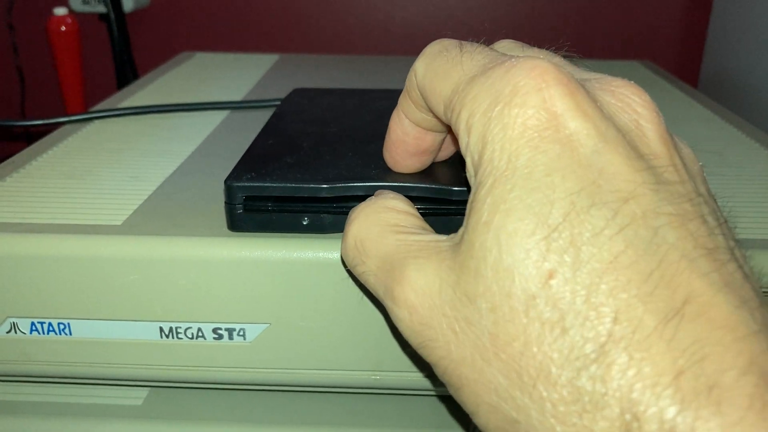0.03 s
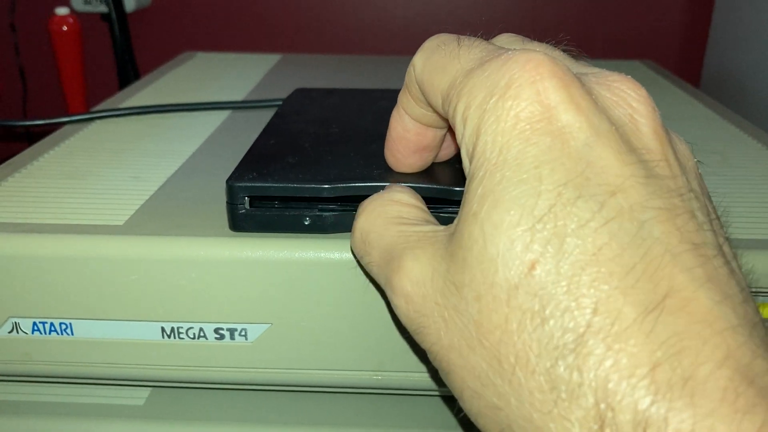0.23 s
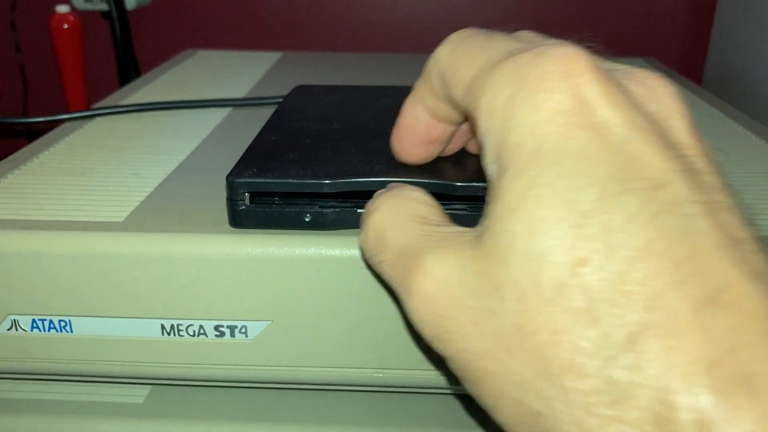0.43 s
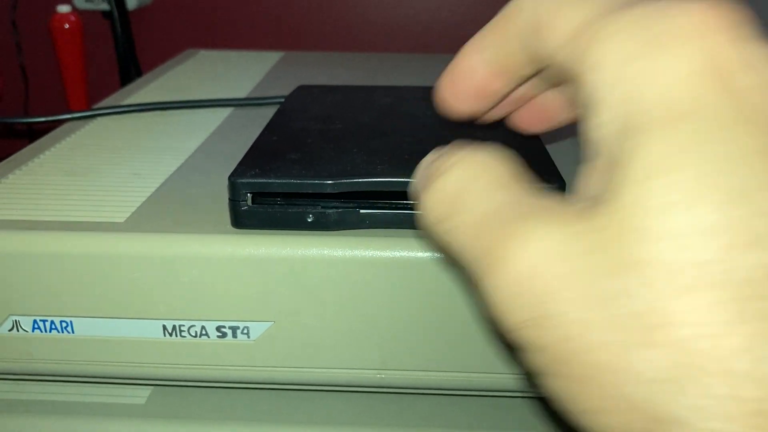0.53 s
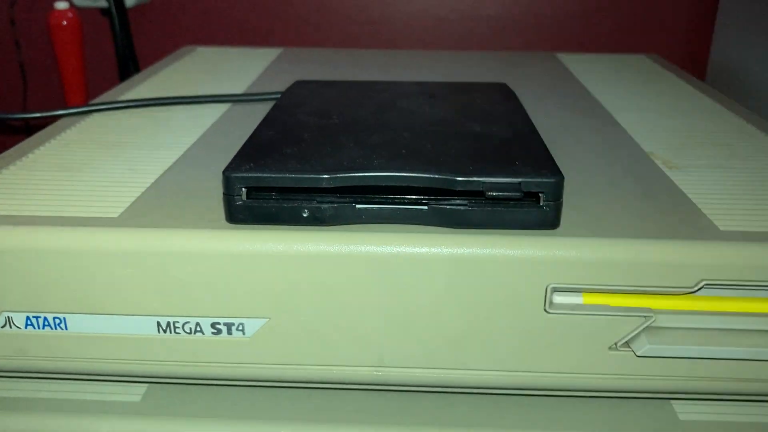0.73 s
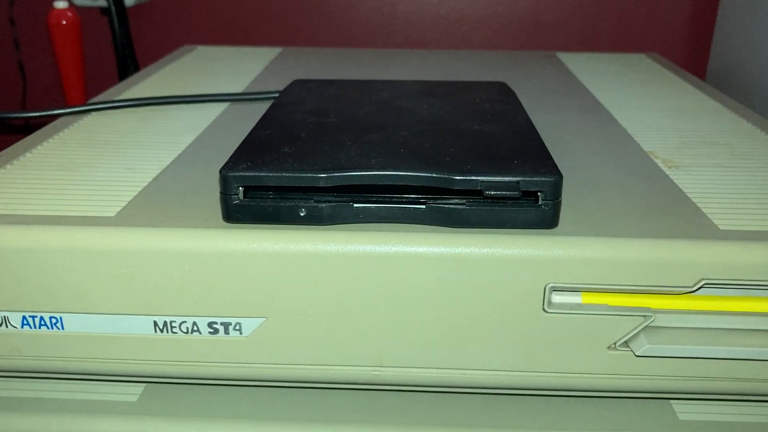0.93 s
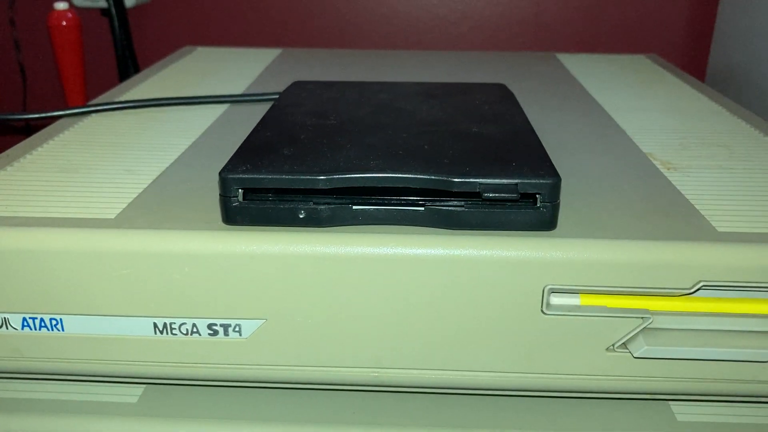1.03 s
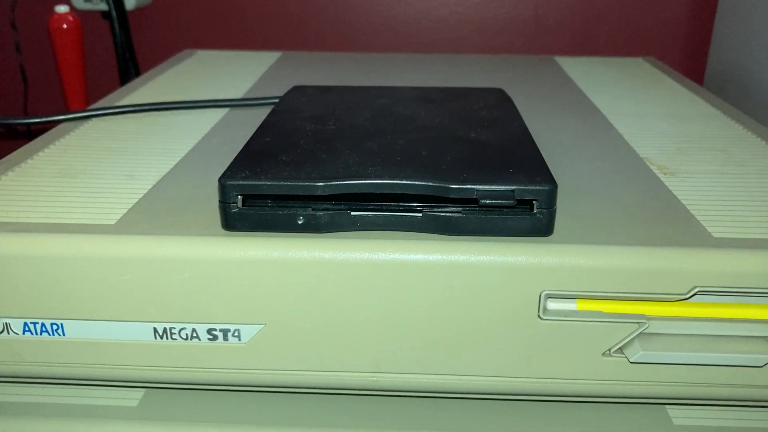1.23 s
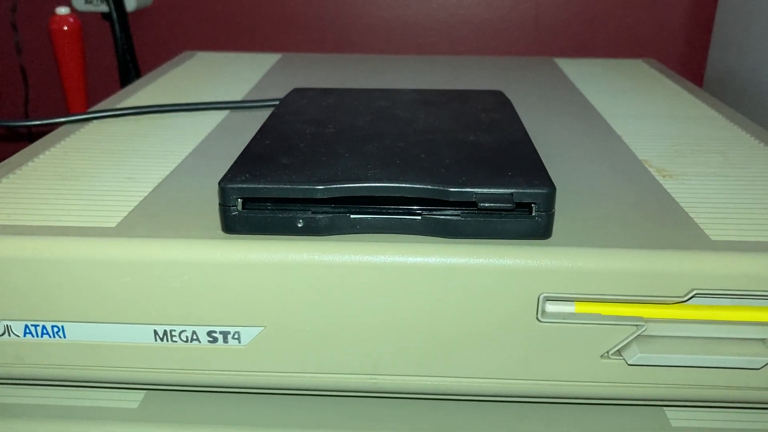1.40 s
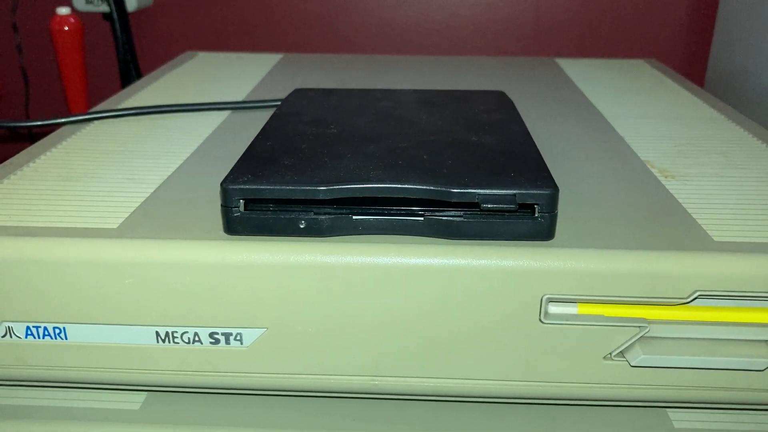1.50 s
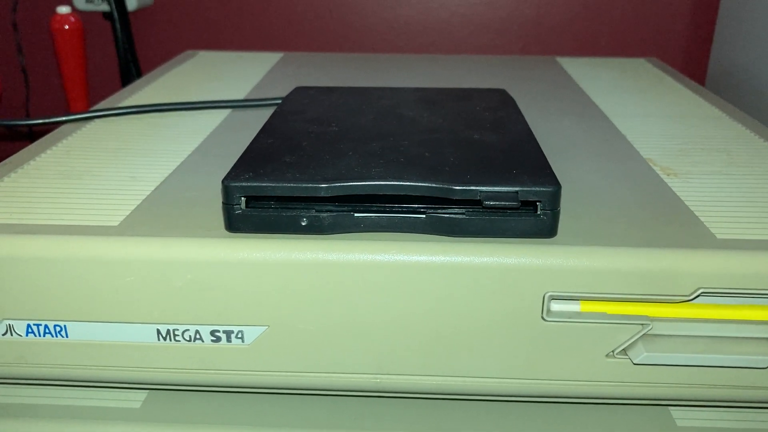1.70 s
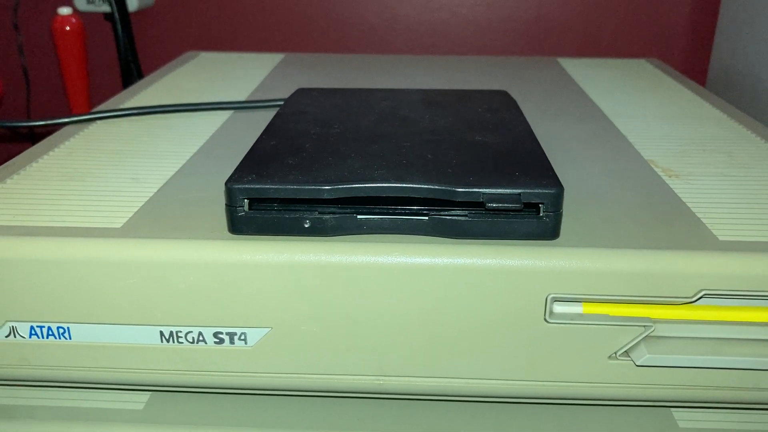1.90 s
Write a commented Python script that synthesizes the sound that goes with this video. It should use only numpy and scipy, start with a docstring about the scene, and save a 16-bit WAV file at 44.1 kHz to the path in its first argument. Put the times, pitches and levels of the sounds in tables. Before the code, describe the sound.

A floppy disk is pushed into a small plastic drive, heard close in stereo: faint rubbing and a tiny tick near 0.1 s, then a loud, bright, rattling clack at 0.2 s with a hollow case thud and short room tail. A light click and raspy motor chirp follow at 0.32 s, strain until 0.6 s, soft spinning until 1.1 s. Steady airy fan whine runs throughout, slightly brighter later.

```python
"""A fan whines throughout, brighter once the hand has moved away, while a floppy disk slides into its drive.
The disk nudges the latch, the carriage snaps down with a clatter and shakes the case, a last catch clicks,
and the drive motor chirps and spins briefly. Contacts excite dense noise rings and decaying sine modes.
Fan and motor layer wavering tones over shaped noise; the disk's rub and the latch scrape are gated noise.
The small plastic drive stands on a computer case, close to a pair of microphone ports."""
import sys
import numpy as np
from scipy import signal
from scipy.fft import rfft, irfft, next_fast_len
from scipy.io import wavfile

SR = 44100
rng = np.random.default_rng(int(sys.argv[2]) if len(sys.argv) > 2 else 0)


def dump_mix(stems):
    """Bounce the given channels to the path in sys.argv[1] as a 16-bit WAV at rate SR."""
    frames = np.atleast_2d(stems).T  # one column per channel
    limited = np.clip(frames, -1, 1)  # hard clip at full scale
    pcm = np.round(limited * 32767).astype(np.int16)
    wavfile.write(sys.argv[1], SR, pcm)


N = 85995  # length [samples]

# Rushing air of the fan: (frequency [Hz], density [dB per Hz])
AIR_SPECTRUM = [(20, -53.5), (35, -41), (55, -13.5), (80, -12.5), (130, -10.5), (250, -11.5), (400, -13),
                (520, -18.5), (680, -7.5), (800, -13), (980, -20), (1200, -12.5), (1360, -19),
                (1550, -13.5), (1850, -12.5), (2050, -19), (2500, -16.5), (2900, -16.5), (3800, -25.5),
                (4150, -18), (4950, -31), (5400, -31), (6500, -30), (6900, -23), (7600, -32.5), (8600, -26),
                (9300, -44), (16000, -59)]
# Disk rubbing in its sleeve or along its guides: (frequency [Hz], density [dB per Hz])
RUB_SPECTRUM = [(30, -34), (70, -16), (160, 2.5), (240, 5), (420, -8.5), (650, 4), (950, -7), (1500, -7),
                (4000, -13.5), (16000, -41)]
# Contacts of disk, latch and carriage: (time [s], level [dB], brightness [dB per octave])
DRIVE_CONTACTS = [(0.0909, -29.5, -4.5), (0.099, -32, -5.5), (.199, -21, -0.5), (0.2, -11.5, 7.5),
                  (.2028, -4, -3), (.2061, 0, 0.5), (0.2086, -5.5, 1), (.212, -6, 0), (.2142, -6, -1.5),
                  (.219, -13.5, -7.5), (0.224, -13, 0), (.3128, -29.5, 1), (0.316, -20, 1)]
CLACK_RISE_S = 0.00027  # attack time constant of the drive's plastic and modes


def amp(db):
    """Turns decibels into gain."""
    return 10 ** (np.asarray(db) / 20)


def unit(x):
    """Scales a sound to rms 1."""
    return x / np.sqrt(np.mean(x ** 2) + 1e-20)


def read(points, hz):
    """Reads a frequency table on a logarithmic axis."""
    f, value = np.transpose(points)
    return np.interp(np.log(hz + 1), np.log(f + 1), value)


def add(mix, s, sound):
    """Mixes a sound in at time s [s], cut off at the end of the mix."""
    part = mix[..., max(round(s * SR), 0):][..., :sound.shape[-1]]
    part += sound[..., :part.shape[-1]]


def colour(x, gain):
    """Filters a sound by a gain that is a function of frequency."""
    n = x.shape[-1]
    size = next_fast_len(2 * n)
    spectrum = rfft(x, size) * gain(np.fft.rfftfreq(size, 1 / SR))
    return irfft(spectrum, size)[..., :n]


def pair(size):
    """White diffuse noise at two nearby ports, partly alike in each band."""
    # Likeness of diffuse sound at the two ports: (frequency [Hz], correlation [0 to 1])
    likeness = [(50, 0.71), (150, 0.7), (300, .8), (1000, 0.42), (2500, .5), (5000, .55), (8000, 1),
                (15000, 1)]
    same = lambda f: np.clip(read(likeness, f), 0, 1)
    left, other = rng.standard_normal((2, size))
    right = colour(left, same) + colour(other, lambda f: np.sqrt(1 - same(f) ** 2))
    return np.array([left, right])


def noise(spectrum):
    """Steady diffuse noise of a given spectrum, rms 1."""
    return unit(colour(pair(N), lambda f: amp(read(spectrum, f))))


def ring(spectrum, t60, rise, size):
    """A dense ring: noise whose bands each die at their own speed."""
    hz, t, bands = signal.stft(pair(size), SR, nperseg=256)
    life = np.maximum(read(t60, hz), 1e-3)[:, None]
    # Short-lived bands start louder, so that decay time does not change their energy
    level = np.sqrt(np.log(1e6) / life / SR)
    x = signal.istft(bands * amp(-60 * t / life) * level, SR, nperseg=256)[1][:, :size]
    attack = 1 - np.exp(-np.arange(size) / SR / rise)
    return colour(x * attack, lambda f: amp(read(spectrum, f)))


def tone(hz, db, waver):
    """A sine whose phase and level waver slowly, as a turning part's do."""
    slow = lambda: unit(colour(rng.standard_normal(N), lambda f: np.exp(-(f / 14) ** 2)))
    turns = hz * np.arange(N) / SR + rng.random()
    level = amp(db) * np.sqrt(2) * (1 + waver * slow())
    return level * np.sin(2 * np.pi * turns + waver * slow())


def gate(on, off, rise, fade):
    """Linear attack, hold and exponential release, all times in seconds."""
    t = np.arange(N) / SR
    return np.clip((t - on) / rise, 0, 1) * np.exp(-np.maximum(t - off, 0) / fade)


def whistles(count=170):
    """Thin steady lines from bearings and vents, at a different phase in each port."""
    # Bearing whistles, some clear, some barely audible: (frequency [Hz], level [dB])
    bearing = [(2358, -106.5), (2552, -70), (2638, -95), (2740, -87.5), (2998, -72.5), (3300, -81.5),
               (3381, -83), (3612, -81), (4016, -91.5), (5340, -90.5)]
    t = np.arange(N) / SR
    line = lambda hz: np.sqrt(2) * np.sin(2 * np.pi * (hz * t + rng.random((2, 1)) / 2))
    # Many faint lines follow the air's spectrum with a random spread in level
    hz = rng.uniform(450, 7000, count)
    spread_db = 4.5 * np.minimum(rng.standard_normal(count), 1)
    phase = np.exp(1j * np.pi * rng.random((2, count)))
    bins = np.zeros((2, N // 2 + 1), complex)
    bins[:, (hz * N / SR).astype(int)] = amp(read(AIR_SPECTRUM, hz) + spread_db) * phase
    faint = amp(-58.5) * unit(irfft(bins, N))
    return faint + sum(amp(db) * line(f) for f, db in bearing)


def fan():
    """Blade tones, motor whine and rushing air, their treble shaded by the hand; mains hum and hiss beneath."""
    # Blade tone and its harmonics: (level [dB], right minus left [dB])
    blades = [(-69.5, 1), (-55, 1.5), (-65, 4), (-77.5, 2.5), (-59.5, -2.5)]
    # The hand's shadow on the fan's treble: (time [s], level [dB])
    hand = [(0, -5), (.4, -2), (.7, -3), (1.1, -2), (1.499, -0.5), (1.95, -0.5)]
    # Hiss beneath the fan: (frequency [Hz], density [dB per Hz])
    hiss = [(100, -73), (5000, 0), (8000, -17.5), (11300, 1.5), (12100, -12), (13500, -5.5), (15200, 7.5),
            (15800, -2), (16300, -40.5)]
    blade_hz, flutter_hz, flutter_depth, shadow_hz = 382.3, 21.6, 0.8, 1085
    t = np.arange(N) / SR

    x = amp(-57) * noise(AIR_SPECTRUM) + whistles()
    for k, (db, side_db) in enumerate(blades):
        sides = amp([[-side_db / 2], [side_db / 2]])
        x = x + tone((k + 1) * blade_hz, db, waver=0.09) * sides
    # The lower motor whine pulses as the motor turns
    flutter = 1 + flutter_depth * np.sin(2 * np.pi * flutter_hz * t)
    x = x + tone(1700.6, -62.5, waver=0.21) * flutter
    x = x + tone(2126.3, -66.5, waver=0.34)

    treble = colour(x, lambda f: f ** 4 / (f ** 4 + shadow_hz ** 4))
    shade = amp(np.interp(t, *np.transpose(hand)))
    mains_hum = tone(59.5, -67, waver=0.27)
    return x + (shade - 1) * treble + mains_hum + amp(-70.5) * noise(hiss)


def slide():
    """The disk rubs along its guides as it goes in: gated friction noise."""
    return amp(-55.5) * noise(RUB_SPECTRUM) * gate(on=0, off=0.199, rise=0.02, fade=0.02)


def brightness(hz, tilt_db):
    """Hard contacts favour the treble, soft ones the middle: a tilt about 3 kHz, level below 700 Hz."""
    return amp(tilt_db * np.log2(np.maximum(hz, 700) / 3000))


def mechanism():
    """The carriage scrapes off its latch; each contact cracks through the dense ring of the plastic."""
    # The drive's dense plastic ring: (frequency [Hz], density [dB per Hz])
    clack = [(30, -71.5), (90, -51), (170, -4), (400, -0.5), (650, 4.5), (900, 4.5), (1700, 2), (2900, 0.5),
             (4000, 5.5), (5300, -3), (6200, 0.5), (8000, -1.5), (11000, -3), (15000, -4), (16500, -23)]
    # Decay of that ring: (frequency [Hz], t60 [s])
    clack_t60 = [(150, 0.065), (1000, 0.06), (4000, 0.034), (15000, 0.027)]
    shared = 0.6  # share of the ring's energy that is the same wherever a contact lands
    grain_db, grain_hz = 1.5, 50.3  # height and width of the shell's many small resonances
    scrape_peak_s, scrape_swell_s = 0.1994, 0.0023
    plastic = lambda: ring(clack, clack_t60, CLACK_RISE_S, size=SR // 4)

    out, body = np.zeros((2, N)), plastic()
    grid = np.arange(0, SR / 2, grain_hz)
    bumps = np.clip(rng.standard_normal(len(grid)), -2, 1.5) * np.minimum(grid / 3000, 1)
    grain = unit(amp(grain_db * bumps))
    for s, db, tilt_db in DRIVE_CONTACTS:
        crack = np.sqrt(shared) * body + np.sqrt(1 - shared) * plastic()
        tint = lambda f: np.interp(f, grid, grain) * brightness(f, tilt_db)
        add(out, s, amp(10.5 + db) * colour(crack, tint))

    swell = np.exp(-abs(np.arange(N) / SR - scrape_peak_s) / scrape_swell_s)
    return out + amp(-25) * noise(clack) * swell


def shell():
    """The same contacts ring modes of the shell and metal carriage; their energies add."""
    # Modes of the shell and metal carriage: (frequency [Hz], level [dB], t60 [s])
    drive_modes = [(407.8, -30, 0.12), (672, -25, 0.047), (745, -33, 0.19), (876.5, -20, 0.031),
                   (936, -30.5, 0.11), (1228, -27, 0.061), (1474, -34, .08), (1590, -24.5, 0.038),
                   (1735, -33, .08), (1950, -30.5, 0.067), (2390, -41, 0.1018), (3743, -28, 0.14),
                   (3975, -42.5, .15), (5140, -23.5, 0.025), (5360, -24.5, 0.063), (8700, -39, 0.13),
                   (10142, -44, 0.036), (11430, -38.5, 0.046), (14393, -40, .05)]
    out, t = np.zeros(N), np.arange(SR // 4) / SR
    for hz, level, t60 in drive_modes:
        mode, energy = np.zeros(N), 0
        fade = amp(level - 60 * t / t60) * (1 - np.exp(-t / CLACK_RISE_S))
        for s, db, tilt_db in DRIVE_CONTACTS:
            wave = np.sin(2 * np.pi * (hz * t + rng.random()))
            blow = amp(db) * brightness(hz, tilt_db) * fade * wave
            add(mode, s, blow)
            energy += np.sum(blow ** 2)
        # Overlapping blows may cancel, so the mode is set to their summed energy
        out += unit(mode) * np.sqrt(energy / N)
    return amp(-2.5) * out


def case():
    """The hollow case thuds and booms under each push; its lowest mode builds slowly."""
    # Pushes on the case: (time [s], level [dB], extra level of the deepest mode [dB])
    thumps = [(0.103, -15.5, -15), (.213, 1, -2), (0.413, -24.5, -3)]
    # The case's dense panel ring: (frequency [Hz], density [dB per Hz])
    thud = [(40, -40), (90, -12), (160, 0.5), (400, -1), (700, -7), (1500, -35), (16000, -80)]
    # Decay of the panel ring: (frequency [Hz], t60 [s])
    thud_t60 = [(100, 0.17), (500, 0.16)]
    # Modes of the case: (frequency [Hz], level [dB], t60 [s], build-up [s])
    case_modes = [(55.8, -21.5, 0.28, .028), (127.8, -34.5, 0.39, .012), (143, -24.5, 0.2, 0.013),
                  (169.1, -24.5, 0.12, 0.0013), (211.2, -32.5, 0.34, 0.0049), (298, -37.5, 0.24, 0.0053),
                  (393.3, -30, 0.14, 0.0055)]
    out, t = np.zeros((2, N)), np.arange(SR) / SR
    for s, db, deep_db in thumps:
        add(out, s, amp(db + 11) * ring(thud, thud_t60, rise=0.005, size=SR // 2))
        for hz, level, t60, rise in case_modes:
            deep = deep_db if hz < 100 else 0
            fade = amp(db + deep + level - 60 * t / t60)
            build = 1 - np.exp(-(t / rise) ** 2)
            add(out, s, fade * build * np.sin(2 * np.pi * hz * t))
    return out


def motor():
    """A raspy starting chirp, a short strain as it gains speed, and the steady hum and rub of the spindle."""
    # Start-up chirp: (frequency [Hz], level [dB])
    chirp_tones = [(974, -50), (1150, -58), (1925, -56), (2040, -54), (2210, -52)]
    # Rasp in the chirp: (frequency [Hz], density [dB per Hz])
    chirp_rasp = [(100, -8), (400, -3), (700, -4), (1000, -1), (1400, -20), (2100, -4), (2800, -8.5),
                  (5000, -18), (9000, -23), (16000, -39)]
    # Strain while the motor gains speed: (frequency [Hz], level [dB])
    strain_tones = [(235, -61.5), (310, -73.5), (950, -66.5)]
    # Spindle hum: (frequency [Hz], level [dB])
    spindle_tones = [(61, -64), (104, -67), (156, -62)]
    spin_on_s, spin_rise_s, spin_fade_s = 0.33, 0.0278, 0.06

    chirp = sum(tone(hz, db, waver=0.5) for hz, db in chirp_tones)
    chirp = chirp + amp(-45) * noise(chirp_rasp)
    chirp = chirp * gate(on=0.315, off=0.352, rise=0.005, fade=0.0097)
    strain = sum(tone(hz, db, waver=1.0) for hz, db in strain_tones)
    strain = strain * gate(spin_on_s, 0.572, spin_rise_s, spin_fade_s)
    hum = sum(tone(hz, db, waver=0.1) for hz, db in spindle_tones)
    spin = hum + amp(-60) * noise(RUB_SPECTRUM)
    return chirp + strain + spin * gate(spin_on_s, 1.108, spin_rise_s, spin_fade_s)


def room(clicks):
    """The room answers the clicks with a diffuse tail: convolution with a decaying noise ring."""
    # Colour of the room: (frequency [Hz], density [dB per Hz])
    room_spectrum = [(80, -25), (250, 3.5), (900, -10.5), (2000, -3), (4000, 2.5), (8000, -4), (15000, -7)]
    # Decay of the room: (frequency [Hz], t60 [s])
    room_t60 = [(100, 0.486), (1000, 0.56), (4000, 0.23), (8000, 0.27), (15000, .2)]
    echo = ring(room_spectrum, room_t60, rise=0.0027, size=SR)
    return amp(-9) * signal.fftconvolve(clicks[:1], echo, axes=1)[:, :N]


def scene():
    """The drive, its clicks answered by the room, over the fan."""
    clicks = mechanism() + shell()
    return fan() + slide() + clicks + room(clicks) + case() + motor()


def record(dry):
    """Two microphone ports differ in phase and level; then the low cut and the band limit."""
    # Phase between the ports: (frequency [Hz], lead of the left [rad])
    port_phase = [(0, 0), (60, -.25), (130, -.35), (700, -.45), (1300, -1.05), (2050, -.4), (2600, -2.2),
                  (3300, -2.8), (4500, -4), (5200, -5.4), (5800, -3.7), (6500, -3.14)]
    # Level between the ports: (frequency [Hz], left minus right [dB])
    port_balance = [(60, 2), (130, 3), (350, -2), (700, 1.5), (1000, -1), (1400, -3), (2380, -1),
                    (4400, 1.5), (5500, 3), (7000, 0), (15000, 0)]
    knee_hz, turn_hz = 6500, 3250  # above the knee the lead grows one turn per turn_hz

    def lead(f):
        """Lead of the left port [rad]: the table, then a steady climb as from a fixed delay."""
        climb = 2 * np.pi * np.maximum(f - knee_hz, 0) / turn_hz
        return np.interp(f, *np.transpose(port_phase)) + climb

    half = lambda f: read(port_balance, f) / 2
    left = colour(dry[0], lambda f: amp(half(f)))
    right = colour(dry[1], lambda f: amp(-half(f)) * np.exp(-1j * lead(f)))
    low_cut = signal.butter(6, 56, "highpass", fs=SR, output="sos")
    x = signal.sosfilt(low_cut, np.array([left, right]))
    band_limit = signal.firwin(255, 16000, window=("kaiser", 9), fs=SR)
    return signal.oaconvolve(x, band_limit[None], "same")


dry = scene()
out = record(dry)
dump_mix(out)
```